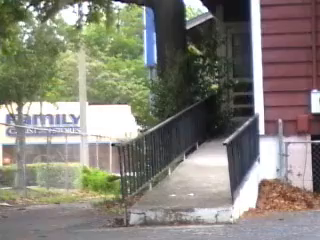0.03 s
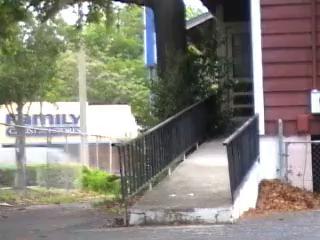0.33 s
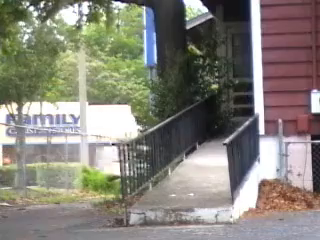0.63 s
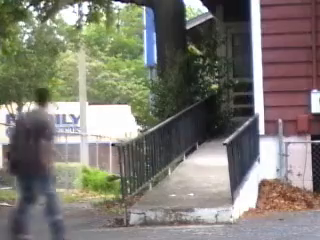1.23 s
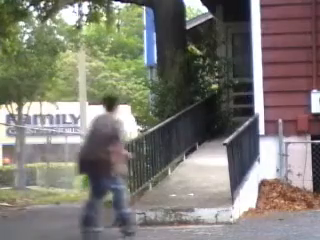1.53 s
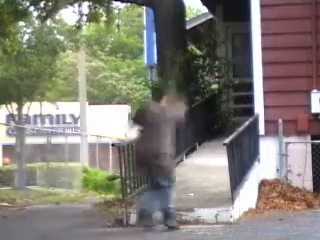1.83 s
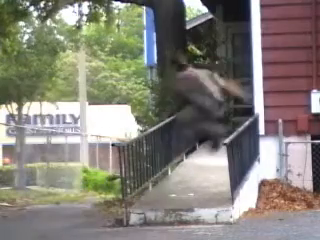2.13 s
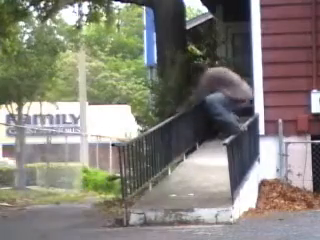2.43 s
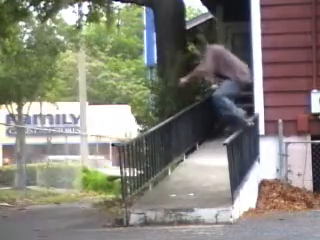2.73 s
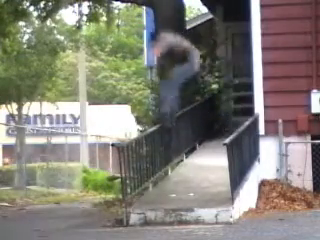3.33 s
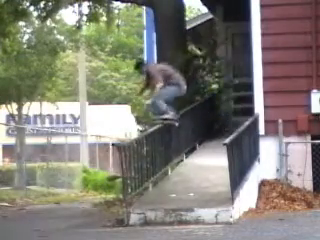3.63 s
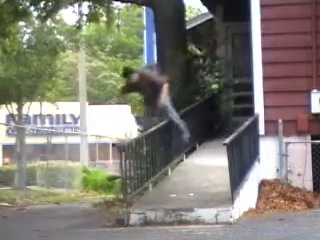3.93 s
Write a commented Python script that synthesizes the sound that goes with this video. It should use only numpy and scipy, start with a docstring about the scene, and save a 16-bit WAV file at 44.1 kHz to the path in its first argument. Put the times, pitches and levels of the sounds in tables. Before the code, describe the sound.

Inline skates roll over asphalt with light clicks, then clack onto a metal railing and grind. A second, louder landing rings and scrapes. Steady traffic and a thin distant whine lie behind, all sounding slightly hollow.

```python
"""Street traffic, an idling engine and a thin falling whine sound as an inline skater rolls over asphalt. After
a brief, distant squeal the skater jumps onto a steel railing, then hops and slams onto it again. Each impact
clacks and excites the rail's normal modes; sliding friction scrapes and keeps them ringing. A porch and wall
reflect the rail's sound. All is heard through a tape camcorder that starts a moment in, and whose comb filter
against drum noise hollows everything slightly."""
import sys
import numpy as np
from scipy import signal
from scipy.fft import rfft, irfft, next_fast_len
from scipy.io import wavfile
from scipy.ndimage import map_coordinates

SR = 44100
rng = np.random.default_rng(int(sys.argv[2]) if len(sys.argv) > 2 else 0)


def inscribe(sig):
    """Save sig as 16-bit PCM at rate SR to the path in sys.argv[1].

    A 1-D sig is mono; a 2-D sig holds one channel per row.
    Samples are clipped to [-1, 1] before scaling.
    """
    pcm = np.round(np.clip(np.atleast_2d(sig).T, -1, 1) * 32767)
    wavfile.write(sys.argv[1], SR, pcm.astype(np.int16))


N = 176400
TIME = np.arange(N) / SR

# impact of hard plastic (frequency [Hz], spectral density [dB])
CLACK_SPECTRUM = [(100, -50), (300, -21), (1200, 4), (3500, -4), (7500, 5), (10500, -2), (12000, -13)]
# normal modes of the steel railing (frequency [Hz], relative level [dB], T60 [s])
RAIL_MODES = [(321, -1.5, 0.28), (1008, 0.5, .25), (1160, -2, 0.35), (1207, 4.5, 0.37), (1333, 4, 0.22),
              (1408, 1, 0.19), (1570, -1.5, 0.45), (1896, -0.5, 0.24), (2025, -2.5, 0.31),
              (2640, -0.5, .18), (2990, -4, 0.38), (3040, -5, 0.24), (3350, -3, 0.24), (3526, 2.5, 0.14),
              (4070, -5, 0.25), (5370, -13, .26)]


def amp(db):
    """Amplitude ratio of a level in decibels."""
    return 10 ** (np.asarray(db) / 20)


def unit(x):
    """Normalisation to rms 1."""
    return x / np.sqrt(np.mean(x ** 2) + 1e-20)


def along(points, hz):
    """Interpolation of (frequency [Hz], value) points on a logarithmic axis."""
    knots_hz, values = np.transpose(points)
    return np.interp(np.log(hz + 1), np.log(knots_hz + 1), values)


def curves(rows):
    """Linear interpolation in time: one curve for each column after the first."""
    times, *columns = np.transpose(rows)
    return [np.interp(TIME, times, column) for column in columns]


def wobble(rate):
    """Smooth random modulation, with rate knots a second."""
    return map_coordinates(rng.standard_normal(8192), [TIME * rate], mode="wrap")


def filtered(x, response):
    """Linear filtering: the spectrum is multiplied by a frequency response."""
    size = next_fast_len(N + SR // 4)
    return irfft(rfft(x, size) * response(np.fft.rfftfreq(size, 1 / SR)), size)[..., :N]


def noise(spectrum, grain_db=0):
    """Partly coherent stereo noise of rms 1; fast amplitude modulation by grain_db makes it grainy."""
    # likeness of left and right (frequency [Hz], correlation [-1 to 1])
    coherence = [(50, -0.5), (130, 0.4), (300, 0.81), (1200, 0.77), (3000, 0.77), (5500, 0.58),
                 (7500, 0.64), (10000, 1)]
    def response(hz):
        angle = np.arccos(np.clip(along(coherence, hz), -1, 1)) / 2
        return amp(along(spectrum, hz)) * [np.cos(angle), np.sin(angle)]
    white = rng.standard_normal((2, N)) * amp(grain_db * wobble(900))
    mid, side = filtered(white, response)
    return unit(np.array([mid + side, mid - side]))


def envelope(start, attack, hold, t60):
    """Linear rise, then exponential decay from hold seconds after the start."""
    age = TIME - start
    return np.clip(age / attack, 0, 1) * amp(-60 * np.maximum(age - hold, 0) / t60)


def tone(hz):
    """A sinusoid of rms 1 whose phase is the integral of its frequency."""
    return np.sqrt(2) * np.sin(2 * np.pi * np.cumsum(hz) / SR)


def background():
    """Steady broadband street noise; the high hiss heard above it briefly drops out twice."""
    # street noise and high hiss (frequency [Hz], spectral density [dB])
    spectrum = [(25, -48), (55, -15.5), (105, -11.5), (160, -11.5), (260, -5), (380, -6.5), (580, -4),
                (705, -2), (820, -3.5), (960, -1.5), (1220, -6.5), (1430, -7.5), (2100, -14.5),
                (3000, -18.5), (3800, -22.5), (6000, -22), (10000, -29.5), (11400, -35.5), (12200, -65)]
    # street noise below the crossover, hiss above it (time [s], relative level [dB])
    street_levels = [(.18, -29.5), (.6, -31.5), (.95, -30.5), (1.12, -30), (1.55, -30.5), (2.1, -30),
                     (2.24, -29.5), (2.32, -31), (2.55, -30), (3.1, -30.5), (3.5, -31.5), (4, -29.5)]
    hiss_levels = [(1.66, 1.5), (1.71, -3), (1.79, -22), (1.82, 1), (3.38, 1.5), (3.42, -5), (3.48, -1.5),
                   (3.54, 3)]
    street_db, = curves(street_levels)
    hiss_db, = curves(hiss_levels)
    crossover_hz = 6060
    wash = noise(spectrum)
    hiss = filtered(wash, lambda hz: 1 - 1 / (1 + (hz / crossover_hz) ** 8))
    street = amp(street_db + 1.45 + 0.49 * wobble(21.09)) * (wash - hiss)
    return street + amp(hiss_db - 30.5) * hiss


def engine():
    """The nearly periodic motion of an idling engine radiates a low, unsteady tone."""
    # the hum (time [s], frequency [Hz], level [dB])
    idle = [(.17, 106.1, -50.5), (.8, 109, -57.5), (1.3, 124.4, -51.5), (3.2, 122.6, -53.5),
            (3.45, 123, -50.5), (3.82, 123.5, -45.5), (4, 124, -47)]
    hz, db = curves(idle)
    return amp(db + 2.3 * wobble(13)) * tone(hz + 1.38 * wobble(8.87))


def whine():
    """A distant whine sinks; random frequency and amplitude modulation roughen it into uneven pulses."""
    # the fundamental and overall strength (time [s], frequency [Hz], level [dB])
    glide = [(.17, 3220, -44), (.7, 3165, -46), (.85, 3050, -50), (1.02, 3090, -37.5), (1.15, 3070, -47),
             (1.62, 3090, -47.5), (1.75, 3020, -55), (1.97, 2960, -45), (2.24, 2937, -44),
             (2.45, 2914, -44.5), (2.9, 2915, -44), (3.3, 2930, -40), (3.5, 2930, -44), (4, 2895, -43.5)]
    hz, db = curves(glide)
    hz = hz + 30 * wobble(130)
    gaps_db = 8 * np.minimum(wobble(22), 0)
    flutter_db = 2.5 * wobble(110)
    harmonics = tone(hz) + amp(-17.5) * tone(2 * hz)
    return amp(db) * unit(amp(flutter_db + gaps_db) * harmonics)


def rolling():
    """Surface roughness excites wheels and ground: a rasp and a rumble that sink low at take-off."""
    # wheel rasp and ground rumble (time [s], level [dB])
    rasp_levels = [(.17, -30), (.33, -34), (.43, -33.5), (.49, -40.5), (.62, -36), (.76, -38.5),
                   (.84, -35.5), (.93, -38), (1.1, -33.5), (1.35, -34.5), (1.55, -35.5), (1.88, -35.5),
                   (2.02, -39), (2.15, -44)]
    rumble_levels = [(.17, -56), (.4, -37), (.55, -38), (1.02, -39), (1.11, -30), (1.19, -36),
                     (1.35, -33.5), (1.5, -45), (1.78, -50), (1.86, -33), (2.02, -57), (2.15, -70)]
    # the same two sounds (frequency [Hz], spectral density [dB])
    rasp_spectrum = [(100, -16), (300, 4.5), (700, -9), (1500, -3), (2200, -2), (2800, 1.5), (4000, -3.5),
                     (6200, -8.5), (8000, -15.5), (10500, -17.5), (12000, -40)]
    rumble_spectrum = [(100, -44), (260, -8), (340, -4), (450, -6), (690, 11.5), (830, -7), (980, 7),
                       (1200, -22), (1410, 8), (2000, -24)]
    rasp_db, = curves(rasp_levels)
    rumble_db, = curves(rumble_levels)
    unevenness = amp(0.85 * wobble(30.2))
    rasp = amp(rasp_db) * noise(rasp_spectrum, grain_db=2)
    rumble = amp(rumble_db) * noise(rumble_spectrum)
    return unevenness * (rasp + rumble)


def skids():
    """Sliding friction gives a narrow band of noise as the wheels slip sideways in each push."""
    # pushes (time [s], duration [s], level [dB])
    pushes = [(0.332, 0.12, -36), (1.115, 0.21, -42.5), (1.848, 0.058, -40)]
    # slipping wheels (frequency [Hz], spectral density [dB])
    spectrum = [(1200, -27), (2200, -11), (2600, 11), (2950, 7), (3400, -12), (4500, -31), (9000, -45)]
    slip = sum(amp(db) * envelope(start, 0.012, hold, t60=0.078) for start, hold, db in pushes)
    return slip * noise(spectrum, grain_db=1)


def clacks():
    """Wheels set down on asphalt: each short impact gives a broadband burst."""
    # ground contacts (time [s], level [dB])
    contacts = [(.366, -41), (.5795, -34.5), (.616, -34.5), (.821, -38), (1.039, -39), (1.295, -39),
                (1.62, -38), (1.829, -40)]
    bursts = sum(amp(db) * envelope(start, 0.001, 0.0018, t60=0.09) for start, db in contacts)
    return bursts * noise(CLACK_SPECTRUM)


def squeal():
    """Two inharmonic partials waver, swell and fade, perhaps from a brake in the street."""
    # the squeal's components (frequency [Hz], level [dB])
    partials = [(1577, -41), (3531, -48.5)]
    sound = sum(amp(db) * tone(hz + 12 * wobble(60)) for hz, db in partials)
    return sound * envelope(1.59, attack=0.06, hold=0.19, t60=0.35)


def ringing(modes):
    """Free vibration is a sum of damped modes; random weights stand for the point of contact."""
    t = np.arange(SR // 2) / SR
    scatter_db = 1.2
    draws = rng.standard_normal((len(modes), 2))
    ring = sum(amp(db + scatter_db * weight - 60 * t / t60) * np.sin(2 * np.pi * hz * t + np.pi * phase)
               for (hz, db, t60), (weight, phase) in zip(modes, draws))
    return ring / np.std(ring[:SR // 50])  # unit strength over the first 20 ms


def landings():
    """Impact excitation: plastic snaps and cracks on steel, the boot knocks, the rail thumps and rings."""
    # skate on rail (time [s], snap [dB], crack [dB], knock [dB], thump [dB], ring [dB])
    blows = [(2.3764, -26, -34, -31, -33, -48), (2.4083, -31, -38, -25.5, -35, -33),
             (2.441, -37, -40, -30, -45, -37), (2.462, -39, -45, -30, -49, -52),
             (3.5525, -29, -28.5, -19.5, -27, -24), (3.5649, -21, -35, -20.5, -19, -21.5),
             (3.5762, -29, -37, -29, -36, -27), (3.585, -23, -34, -29, -41, -27),
             (3.622, -29, -42, -31, -30, -26)]
    # plastic on steel; boot and frame (frequency [Hz], spectral density [dB])
    snap_spectrum = [(150, -50), (600, -26), (2000, 4), (3400, 8), (5500, 1), (8000, -8), (11000, -19)]
    boot_spectrum = [(80, -50), (200, -19), (300, 6.5), (550, -11), (1200, 8), (2200, -8.5), (3500, -0.5),
                     (6000, -15), (11000, -33)]
    # normal modes of the skate's frame (frequency [Hz], relative level [dB], T60 [s])
    frame_modes = [(6140, -9, .078), (7620, 0, 0.065), (8260, -8, 0.13)]
    flexure_hz, ping_s, ping_db = 319, 2.3765, -38
    snap, crack, knock = noise(snap_spectrum), noise(CLACK_SPECTRUM), noise(boot_spectrum)
    impacts, ring = np.zeros((2, N)), np.zeros(N + SR)
    for start, snap_db, crack_db, knock_db, thump_db, ring_db in blows:
        thump = np.sin(2 * np.pi * flexure_hz * (TIME - start))  # the whole railing flexes under load
        impacts += amp(snap_db) * snap * envelope(start, 0.0002, 0.001, t60=0.023)
        impacts += amp(crack_db) * crack * envelope(start, 0.0005, 0.002, t60=0.058)
        impacts += amp(knock_db) * knock * envelope(start, 0.0008, 0.002, t60=0.087)
        impacts += amp(thump_db) * thump * envelope(start, 0.002, 0.004, t60=0.068)
        ring[round(start * SR):][:SR // 2] += amp(ring_db) * ringing(RAIL_MODES)
    ring[round(ping_s * SR):][:SR // 2] += amp(ping_db) * ringing(frame_modes)  # first touch only
    return impacts + ring[:N]


def grinds():
    """Forced vibration: friction of the soles drives the rail's modes, scrapes, and hisses at a bite."""
    # soles sliding (time [s], duration [s], level [dB], T60 [s])
    slides = [(2.367, 0.092, -31, 0.34), (2.47, 0.43, -41, 0.78), (3.56, 0.082, -19.5, 0.3),
              (3.706, 0.23, -38.5, 0.27), (3.94, 0.059, -35.5, .2)]
    # soles biting (time [s], duration [s], level [dB])
    bites = [(3.571, 0.049, -26.5), (3.934, .025, -42)]
    # coarse scrape and glassy hiss (frequency [Hz], spectral density [dB])
    scrape_spectrum = [(80, -50), (150, -12), (400, 6), (800, 8.5), (1250, 7), (2000, 6), (3600, 2),
                       (4600, 2), (6300, -3), (8000, -13.5), (10500, -12), (12000, -44)]
    hiss_spectrum = [(2500, -25), (5000, -0.5), (6500, 6), (8000, -13), (10000, -7), (11500, -8.5)]
    attack_s, ring_db = 0.018, -7
    friction = sum(amp(db) * envelope(start, attack_s, hold, t60) for start, hold, db, t60 in slides)
    friction *= amp(0.27 * wobble(100))
    response = ringing(RAIL_MODES)
    ring = signal.fftconvolve(friction * rng.standard_normal(N), response / np.linalg.norm(response))[:N]
    biting = sum(amp(db) * envelope(start, attack_s, hold, t60=0.13) for start, hold, db in bites)
    hiss = biting * noise(hiss_spectrum)
    scrape = friction * noise(scrape_spectrum, grain_db=1.1)
    return scrape + amp(ring_db) * ring + hiss


def porch(x):
    """Diffuse reflection from the porch and house wall adds a short, dull reverberation."""
    delay_s, cutoff_hz, level_db = 0.015, 7000, -12
    decay = envelope(delay_s, attack=0.0076, hold=0, t60=0.63)
    tail = (rng.standard_normal((2, N)) * decay)[:, :SR // 2]
    reflected = signal.fftconvolve(x, tail / np.linalg.norm(tail[0]), axes=1)[:, :N]
    return amp(level_db) * filtered(reflected, lambda hz: 1 / (1 + (hz / cutoff_hz) ** 4))


def drum_comb(hz):
    """Destructive interference with a delayed copy notches out multiples of the tape drum's rate."""
    drum_hz, depth, feedback = 149.8, 0.87, 0.55
    delay = np.exp(-2j * np.pi * hz / drum_hz)
    return (1 - depth * delay) / (1 - feedback * delay)


def motor():
    """Vibration of the camcorder's motor adds faint, wavering high tones."""
    # motor tones (frequency [Hz], level [dB])
    partials = [(3833, -57.5), (6934, -60), (7251, -63.5), (7615, -76), (7890, -74)]
    return sum(amp(db + 2.2 * wobble(8)) * tone(hz + 4 * wobble(25.4)) for hz, db in partials)


def follow(x, seconds):
    """Exponential averaging with the given time constant."""
    pole = np.exp(-1 / (seconds * SR))
    return signal.lfilter([1 - pole], [1, -pole], x)


def gain_control(x):
    """Compression: the gain falls briefly as the short-term power exceeds a threshold."""
    threshold_db, slope = -23, 0.6
    level_db = 10 * np.log10(follow(np.mean(x ** 2, axis=0), seconds=0.0023) + 1e-12)
    excess_db = np.maximum(level_db - threshold_db, 0)
    return x * amp(-slope * follow(excess_db, seconds=0.018))


def scene():
    """Superposition of skater and street; only the sounds at the rail reverberate."""
    rail = landings() + grinds()
    skater = rail + porch(rail) + rolling() + skids() + clacks()
    return skater + background() + engine() + whine() + squeal()


def record(dry):
    """The camcorder's signal chain filters, adds motor tones, compresses and starts a moment in."""
    # channel imbalance (frequency [Hz], left minus right level [dB])
    balance = [(60, -2), (120, -5), (300, 1.1), (700, 0.8), (2000, 1.5), (5000, 0.1), (11000, -0.5)]
    start_s, low_cut_hz, top_hz = 0.165, 44, 12100
    sides = np.array([[0.5], [-0.5]])
    sound = filtered(dry, lambda hz: drum_comb(hz) * amp(along(balance, hz) * sides))
    sound = signal.sosfilt(signal.butter(2, low_cut_hz, "highpass", fs=SR, output="sos"), sound)
    sound = gain_control(amp(-0.87) * sound + motor())
    return filtered(sound * (TIME > start_s), lambda hz: hz < top_hz)


dry = scene()
out = record(dry)
inscribe(out)
```